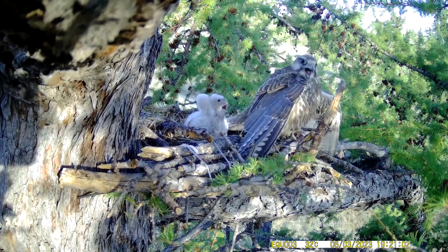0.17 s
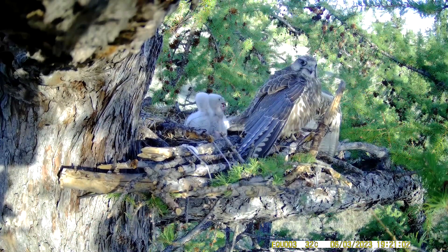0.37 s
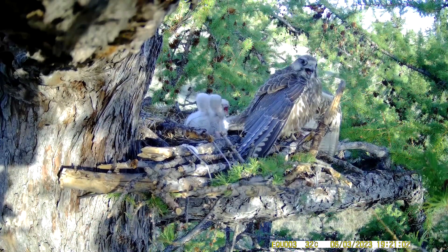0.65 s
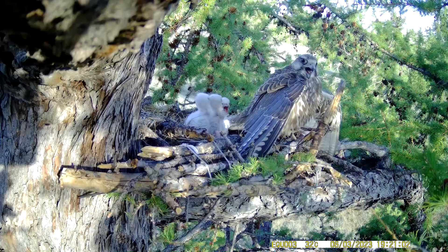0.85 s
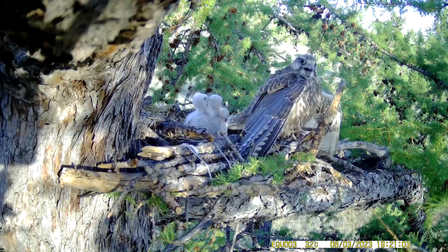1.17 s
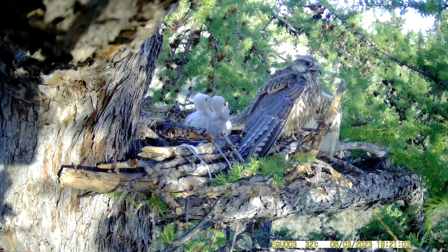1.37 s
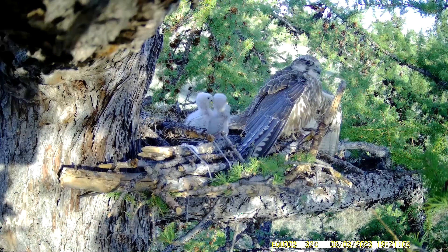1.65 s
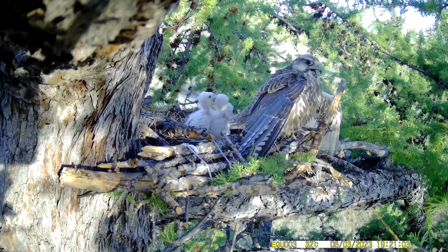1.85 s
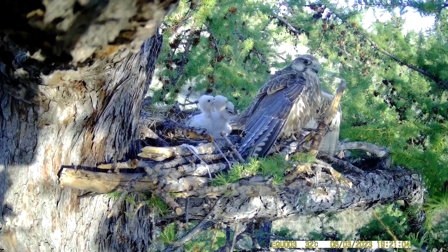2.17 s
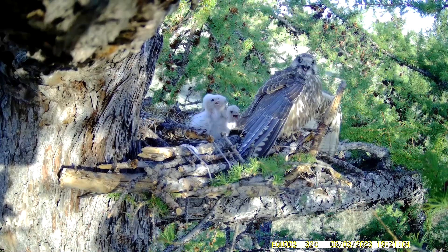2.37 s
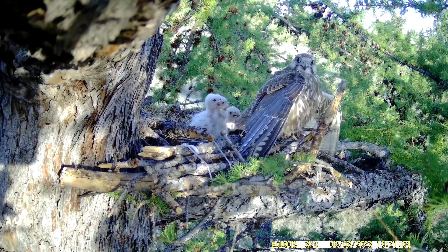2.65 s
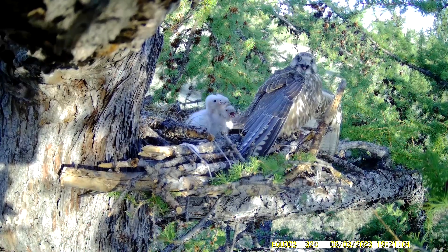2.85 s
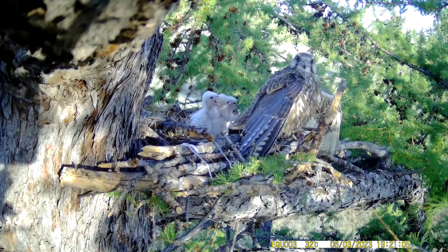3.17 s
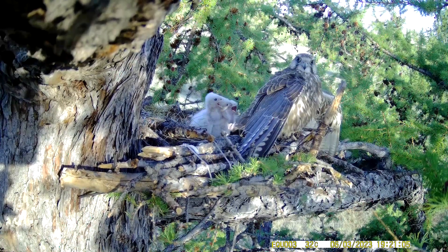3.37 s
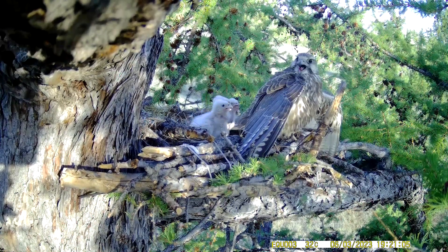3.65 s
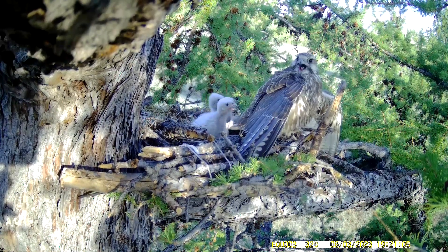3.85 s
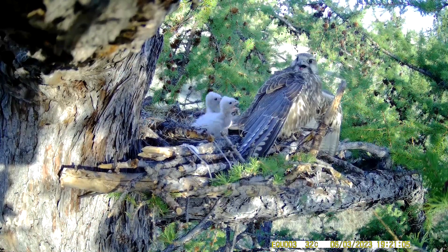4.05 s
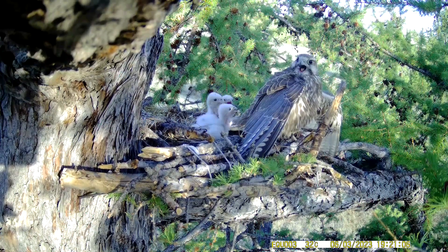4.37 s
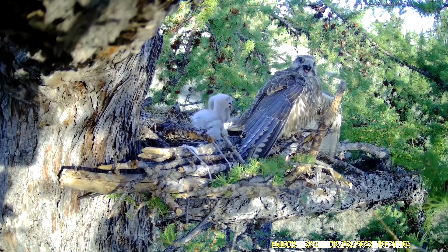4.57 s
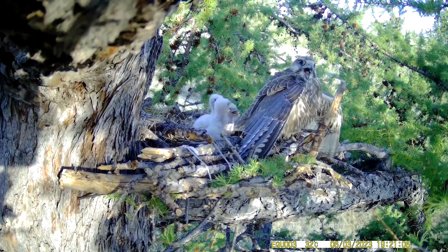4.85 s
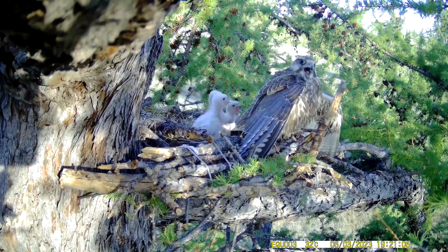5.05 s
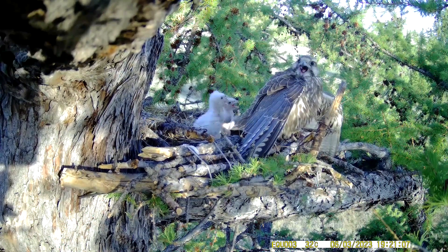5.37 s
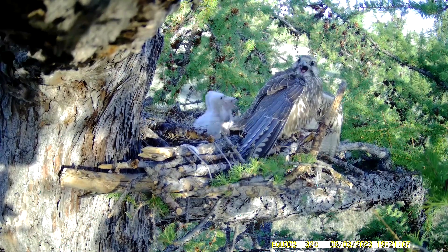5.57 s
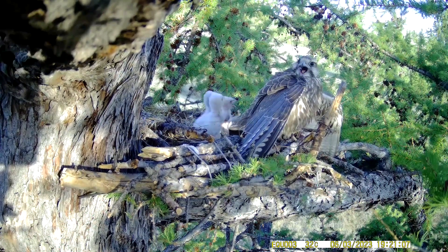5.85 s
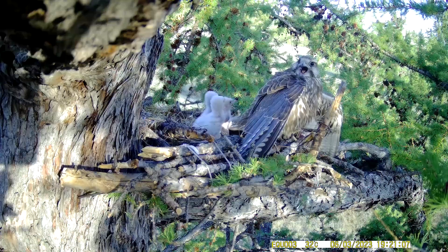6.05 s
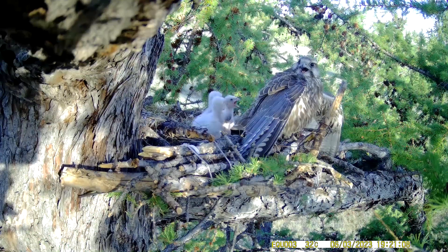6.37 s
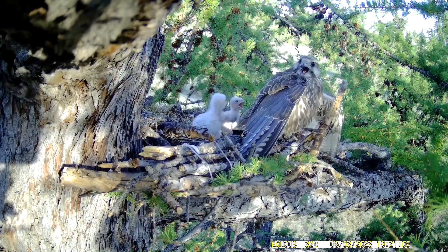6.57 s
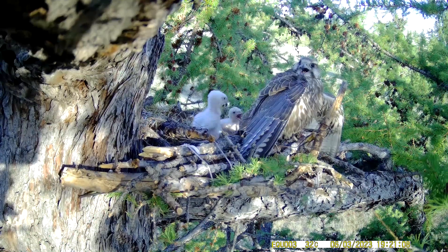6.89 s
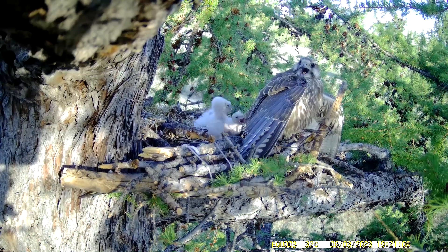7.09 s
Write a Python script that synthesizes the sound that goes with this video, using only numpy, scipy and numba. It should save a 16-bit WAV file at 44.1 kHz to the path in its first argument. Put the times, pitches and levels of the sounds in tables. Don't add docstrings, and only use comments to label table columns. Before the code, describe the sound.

A falcon calls close to a small outdoor microphone at a tree nest. Thirteen harsh screams begin at about 0, 0.5, 1.15, 1.75, 2.2, 2.7, 3.4, 4.2, 4.8, 5.2, 5.8, 6.4 and 6.9 seconds, the last running almost to the end. Each starts with a quick creaky click, rings bright and piercing around 1.1 to 1.25 kHz with strong overtones, climbs slightly, roughens and falls sharply. The longest, from 3.4 to 4.1, falters near its end; later ones often crack high before settling. In the gaps chicks give faint hoarse rasps and thin peeps, notably around 1, 1.5, 2.1, 3.3, 4.1, 4.65 and 5.7 seconds. Soft leaf hiss continues beneath. Two dull wind bumps come near 0.1 and 0.4; stronger low thumps cluster from 6.5 to 7.1. A very short echo scatters off trunk and branches.

```python
import sys
import numpy as np
from scipy import signal
from scipy.fft import rfft, irfft
from scipy.io import wavfile
from scipy.ndimage import uniform_filter1d
from numba import njit

SR = 44100
rng = np.random.default_rng(int(sys.argv[2]) if len(sys.argv) > 2 else 0)


def invert_db(level):
    return 10 ** (np.asarray(level, dtype=float) / 20)


def materialize(psi):
    bounded = np.clip(np.atleast_2d(psi).T, -1, 1)
    quanta = np.round(bounded * 32767).astype(np.int16)
    wavfile.write(sys.argv[1], SR, quanta)


N = 318400
T = np.arange(N) / SR


def shape_db(hz, points):
    f, db = np.transpose(points)
    return np.interp(np.log(np.maximum(hz, 1)), np.log(f), db)


def colour(x, points):
    hz = np.arange(len(x) // 2 + 1) * SR / len(x)
    return irfft(rfft(x) * invert_db(shape_db(hz, points)), len(x))


def unit(x):
    return x / np.sqrt(np.mean(x ** 2))


def walk(rate):
    hold = max(int(SR / rate), 1)
    steps = np.repeat(rng.standard_normal(N // hold + 1), hold)
    slewed = uniform_filter1d(uniform_filter1d(steps, hold), hold)
    return unit(slewed[:N])


def bumps(events, power):
    return sum(height * np.sin(np.pi * np.clip((T - at) / length, 0, 1)) ** power
               for at, length, height in events)


@njit
def svf(x, hz, width):
    y, band, low = np.empty(len(x)), 0., 0.
    for i in range(len(x)):
        g, k = np.tan(np.pi * hz[i] / SR), width / hz[i]
        v = (band + g * (x[i] - low)) / (1 + g * (g + k))
        band, low, y[i] = 2 * v - band, low + 2 * g * v, k * v
    return y


def wind():
    # time_s, level_db
    puffs = [(0.0, -45.5), (0.18, -54), (0.42, -48.5), (4.93, -54), (5.03, -47.5), (5.81, -52), (6.15, -48),
             (6.35, -60), (6.54, -40.5), (6.67, -51.5), (6.71, -43.5), (6.78, -54), (6.98, -39),
             (7.02, -54), (7.1, -40.5), (7.22, -57)]
    # pitch_hz, density_db
    buffet = [(12, -12), (20, 5), (47, -2.5), (166, -20), (300, -32), (390, -30), (660, -120)]
    # start_s, peak_db, pitch_hz
    thumps = [
        (0.066, -35.5, 51),
        (0.429, -35, 52.4),
        (6.513, -32, 67.3),
        (6.569, -36, 50.8),
        (6.705, -28, 80.6),
        (6.837, -36, 51.3),
        (6.925, -31, 64.5),
        (6.967, -29.5, 90.4),
        (7.094, -33, 65.2),
    ]
    eddies = unit(colour(rng.standard_normal(N) * invert_db(3.5 * walk(25)), buffet))
    out = eddies * invert_db(np.interp(T, *np.transpose(puffs)))
    for start, db, hz in thumps:
        t = T - start - .014
        out += invert_db(db) * np.exp(-(t / 0.0057) ** 2) * np.sin(2 * np.pi * hz * t + 0.41)
    return out


def leaves():
    # pitch_hz, density_db
    foliage = [(120, -30.5), (200, -2.5), (940, 2), (1150, -1.5), (1980, 3), (2290, -21), (3610, -25),
               (4500, -11), (15500, -12)]
    level_db = -62.5
    return invert_db(level_db + walk(2.8)) * unit(colour(rng.standard_normal(N), foliage))


def ring(s, hz, t60, db):
    t = np.clip(T - s, 0, 3 * t60)
    decay = invert_db(db - 60 * t / t60)
    onset = 1 - np.exp(-t / 0.00071)
    return decay * onset * np.sin(2 * np.pi * hz * t) * (T - s < 3 * t60)


def creaks():
    # start_s, first_gap_s, first_db, second_db
    creak_rows = [(.0062, 0.0031, -23, -19.5), (0.485, 0.0056, -34, -18.5), (1.143, 0.0057, -33, -26),
                  (1.7507, .004, -18.5, -20.5), (2.2072, 0.0055, -31, -21), (2.711, 0.0038, -18, -18),
                  (3.4365, .0045, -21, -28), (4.1905, .0065, -21.5, -28), (4.7647, 0.0052, -22, -30.5),
                  (5.2251, 0.0065, -22, -26), (5.8163, .0062, -25, -34), (6.3872, 0.0053, -21.5, -41),
                  (6.9236, 0.0053, -21, -22)]
    windpipe_hz, t60_s = 2160, 0.0061
    speedup, last_db = .85, -3
    out, chance = np.zeros(N), rng.standard_normal((len(creak_rows), 3))
    for (first, gap, first_db, second_db), detunes in zip(creak_rows, chance):
        third = first + gap * (1 + speedup)
        snaps = ((first, first_db), (first + gap, second_db), (third, second_db + last_db))
        for (s, db), detune in zip(snaps, detunes):
            for lag, lag_db in ((0, 6.9), (.0012, 1.5)):
                out += ring(s + lag, windpipe_hz * (1 + .04 * detune), t60_s, db + lag_db)
            out += ring(s, windpipe_hz / 2.23, t60_s, db - 8.0)
    return out


def effort():
    # start_s, end_s, settled_pitch_hz, top_pitch_hz, climb_share (0-1 of the scream)
    screams = [(.024, .326, 1145, 1205, 0.76), (.502, .946, 1113, 1241, .89),
               (1.159, 1.487, 1164, 1213, .8), (1.763, 2.045, 1074, 1136, 1),
               (2.223, 2.557, 1087, 1172, 0.82), (2.725, 3.075, 1097, 1201, 0.81),
               (3.445, 4.065, 1074, 1243, 0.96), (4.201, 4.639, 1154, 1256, 0.97),
               (4.776, 5.12, 1172, 1238, 0.8), (5.241, 5.697, 1158, 1255, 0.61),
               (5.827, 6.269, 1183, 1251, 0.65), (6.398, 6.796, 1169, 1252, 0.62),
               (6.937, 7.4, 1163, 1258, .65)]
    # peak_db, swell_db, second_over_first_db, hoarseness_db, final_drop_s (time constant)
    voices = [(-25.5, 4.5, 4.5, -1, .011), (-24.5, 7.5, 6, 0, .013), (-27, 8, 5, 0.5, .015),
              (-31.5, 6.5, 8.5, 2, .012), (-26.5, 10, 9, 2.5, .015), (-25, 10, 7, -0.5, .023),
              (-24.5, 11, 5.5, 2.5, .012), (-24.5, 8, 2.5, 1, .011), (-26, 5.5, 1.5, -1.5, 0.0093),
              (-24, 5.5, 2.5, 1.5, .009), (-24, 7, 2, -0.5, 0.01), (-24, 7, 1, -0.5, 0.011),
              (-24.5, 6, 2, -0.5, .01)]
    # start_s, length_s, shift_hz
    slips = [(0.015, 0.0592, 12), (0.076, 0.13, -12), (4.77, 0.0276, -25), (1.24, 0.082, -8),
             (2.1, 0.099, 4.5), (6.64, 0.0985, -6), (5.8, .2, -10), (3.5, 0.57, 25.5), (4.54, 0.085, 24),
             (5.46, 0.068, 8), (5.55, .04, -20), (6.13, 0.095, 19.5)]
    # flip_s, offset_hz
    kicks = [
        (1.36, -45),
        (4.251, 110),
        (4.82, 90),
        (5.3, 39.5),
        (5.862, 95),
        (6.436, 114.5),
        (6.99, 22),
    ]
    # start_s, length_s, dip_hz
    stumbles = [
        (3.755, 0.043, 12.8),
        (3.812, 0.028, 19),
        (3.89, 0.051, 16),
        (3.955, 0.027, 22),
        (4.385, 0.029, 10),
        (5.6, .02, 14.7),
        (5.645, 0.022, 12.7),
    ]
    # start_s, length_s, rise_db
    rasp_spells = [(.01, 0.018, 6), (.12, 0.13, 6), (.63, .2, 3), (1.145, .03, 5), (1.26, 0.14, 0),
                   (1.75, 0.035, 6), (2.712, 0.032, 14.5), (2.86, 0.16, 6), (3.56, 0.21, 4), (4.3, 0.11, 4),
                   (6.922, .025, 3)]
    # start_s, length_s, rise_db
    doublings = [(.02, 0.02, 24), (.05, .04, 18), (.26, 0.064, 6), (.56, 0.088, 18), (.84, 0.073, 4.5),
                 (1.155, 0.036, 19), (1.2, 0.033, 11), (1.42, .06, 8), (1.86, .05, 25), (1.93, 0.047, 30),
                 (1.995, 0.042, 29), (2.3, 0.092, 24), (2.712, .03, 29.5), (2.42, 0.067, 12.5),
                 (2.76, .1, 24), (4.36, .14, 6), (5.39, 0.11, 1), (6.02, 0.097, 4)]

    rows = np.hstack([screams, voices])
    which = np.searchsorted((rows[1:, 0] + rows[:-1, 1]) / 2, T)
    start, end, low_hz, top_hz, climb, peak_db, swell_db, lift_db, hoarse_db, drop_s = rows[which].T
    since, left = np.maximum(T - start, -.01), np.maximum(end - T, -.006)
    u = np.clip(since / (end - start), 0, 1)
    opening = np.clip((T - start + 0.012) / 0.018, 0, 1)
    closing = np.clip((end + 0.0073 - T) / 0.0082, 0, 1)
    gate = opening * closing

    pushed = low_hz + (top_hz - low_hz) * np.minimum(u / climb, 1) + bumps(slips, 1)
    kick_fall_s = .004
    kick = sum(hz * (which == which[int(s * SR)]) * (1 + np.tanh((s - T) / kick_fall_s / 2)) / 2
               for s, hz in kicks)
    sag = np.exp(-left / drop_s)
    stumble = bumps(stumbles, 0.515)
    scoop_hz = 59.1 * np.exp(-since / .018)
    hz = pushed - stumble + kick - scoop_hz - 231.6 * sag

    shut_db = 16 * np.clip(1 - left / 0.0069, 0, 1)
    swelling_db = swell_db * (1 - np.minimum(u / 0.75, 1)) ** 1.46
    air_db = peak_db - swelling_db - 3 * np.exp(-since / 0.015) - shut_db
    sag_db = 21.5 * sag
    dull_db = 3 * kick / 100
    first_db = air_db - sag_db
    second_db = air_db + lift_db - 0.245 * sag_db - dull_db - 0.18 * stumble
    fourth_db = air_db - 5.5 + 0.21 * lift_db - dull_db + u - 1.48 * sag_db

    strain_hz, slack_db_per_hz, slack_max_db = 1228, 0.13, 13.5
    slack_db = np.clip(slack_db_per_hz * (strain_hz - pushed), 0, slack_max_db) - hoarse_db
    rasp_start_db = 9 * np.exp(-since / .015)
    rasp_end_db = np.maximum(7 - lift_db, 0) * np.minimum(2 * sag, 1)
    rasp_db = -39 - slack_db - shut_db + rasp_start_db + rasp_end_db + bumps(rasp_spells, 0.61)
    half_end_db = 7.5 * np.exp(-left / 0.045)
    half_db = -43.5 - 2.03 * slack_db - shut_db + half_end_db + bumps(doublings, 0.29)
    return gate, hz, first_db, second_db, fourth_db, half_db, rasp_db


def falcon():
    # pitch_hz, level_db
    upper = [(3000, 2), (4800, 0.5), (6000, -16), (7400, -15), (8700, -16), (10000, -23), (11500, -25),
             (13000, -39.5), (15500, -41)]
    # pitch_hz, level_db
    halves = [(600, -28), (1800, -15), (3000, -4.5), (4300, -13), (5500, -21.5), (8000, -20),
              (12000, -42.5)]
    # pitch_hz, level_db
    throat = [(250, -44), (700, -35), (1400, -14), (2000, -12.5), (2900, 5), (4200, -9.5), (5600, -12),
              (8000, -13), (15500, -29)]
    # start_s, length_s, rise_db
    flares = [
        (4.55, .06, 15),
        (6.15, .08, 11),
        (5.5, .15, 6),
    ]
    notch_hz, notch_width_hz, notch_depth_db = 3570, 85, -12
    windpipe_ratio, windpipe_width_hz = 2.2, 80.0

    gate, hz, first_db, second_db, fourth_db, half_db, rasp_db = effort()
    strain = np.minimum(invert_db(rasp_db - second_db + 20), 2)
    hz = hz * (1 + .001 * walk(45) + .0022 * strain * walk(110))
    phase = 2 * np.pi * np.cumsum(hz) / SR + 0.018 * strain * walk(900)
    lift_db = np.clip(uniform_filter1d(second_db - first_db, 6000), -2, 12) - 0.5
    flicker = np.clip(1 + .45 * walk(70), 0, 3)
    voice = invert_db(first_db) * np.sin(phase)
    voice += invert_db(second_db + 0.27 * strain * walk(180)) * np.sin(2 * phase + 0.29)
    for k in range(3, 15):
        tilt_db = lift_db * (-.15 * min(k - 4, 3) + 0.069 * max(k - 8, 0))
        notch_db = notch_depth_db * flicker * np.exp(-((k * hz - notch_hz) / notch_width_hz) ** 2)
        waver_db = (.3 + .2 * k) * walk(35)
        db = fourth_db + shape_db(k * hz, upper) + notch_db + tilt_db + waver_db
        voice += invert_db(db) * np.sin(k * phase + 0.24 * k) * (k * hz < 16000)

    doubling = invert_db(half_db + 3 + 3.5 * walk(25))
    slip = .4 * walk(60)
    rasp_db = np.minimum(rasp_db, fourth_db + 10)
    smear = invert_db(rasp_db - 4.5) * walk(200)
    for k in np.arange(.5, 12):
        line = invert_db(shape_db(k * hz, halves) + 2.5 * walk(50)) * np.sin(k * phase + slip + 1.94 * k)
        voice += (doubling + smear) * line

    breath = unit(colour(rng.standard_normal(N), throat)) * (1 + 1.11 * np.cos(phase))
    pipe = unit(svf(rng.standard_normal(N), windpipe_ratio * hz, windpipe_width_hz))
    flare_db = bumps(flares, .5)
    rasp = invert_db(rasp_db + 2.5 * walk(45)) * (invert_db(-9) * breath + invert_db(flare_db - 6) * pipe)
    return gate * (np.sqrt(2) * voice + rasp)


def chicks():
    # start_s, end_s, first_db, last_db, voice_hz
    begs = [(.3, 0.362, -51, -57, 1450), (1.08, 1.126, -82, -80, 1400), (1.46, 1.684, -54.5, -53.5, 1440),
            (1.734, 2.118, -58, -50, 1300), (2.518, 2.718, -59, -46.5, 1380),
            (3.085, 3.376, -72, -48, 1340), (4.0, 4.119, -53, -47, 1310), (4.601, 4.667, -40, -52.5, 1390),
            (4.712, 5.131, -67, -50.5, 1400), (5.66, 5.729, -63, -58, 1240),
            (6.219, 6.395, -55.5, -62, 1430), (6.758, 6.92, -60, -70, 1530)]
    # pitch_hz, width_hz, level_db
    throat_bands = [
        (2160, 520, -4.5),
        (3060, 560, -3),
        (4400, 1170, -2),
        (8100, 2100, -22.5),
    ]
    # start_s, # length_s, start_hz, end_hz, level_db
    peeps = [(.955, .145, 2440, 2460, -56), (1.039, .095, 1270, 1470, -54.5), (.383, .1, 1650, 1660, -60),
             (.346, .047, 1450, 1070, -55), (1.55, .09, 1500, 1420, -52), (1.638, .05, 1393, 997, -53),
             (2.105, .024, 1256, 1100, -49), (2.14, .076, 1450, 1450, -61), (3.357, .0317, 1277, 1062, -48),
             (3.39, .04, 1470, 1450, -64), (4.11, .075, 2450, 2480, -62), (6.804, .096, 1498, 1546, -64),
             (.948, .028, 2300, 2250, -50), (5.705, .03, 2250, 2350, -54)]
    fade_s, nestle_db = 0.031, -60
    begging = invert_db(nestle_db)
    for start, end, db0, db1, _ in begs:
        fade = np.interp(T, (start - fade_s, start, end, end + fade_s), (0, 1, 1, 0))
        begging = begging + invert_db(np.interp(T, (start, end), (db0, db1))) * fade
    noise = rng.standard_normal(N) * invert_db(0.43 * walk(120))
    middles = [(row[0] + row[1]) / 2 for row in begs]
    voice_hz = np.interp(T, middles, [row[4] for row in begs])
    rasp = unit(svf(svf(noise, voice_hz, 350.0), voice_hz, 480.0))
    for hz, width, band_db in throat_bands:
        centre = hz * (1 + 0.07 * walk(7))
        band = unit(svf(svf(noise, centre, 1. * width), centre, 0.67 * width))
        rasp += invert_db(band_db + 2 * walk(14)) * band
    out = unit(rasp) * begging

    waver = 1 + 0.00765 * walk(90)
    for start, length, hz0, hz1, peep_db in peeps:
        over_db = -2 if abs(np.log(hz1 / hz0)) > 1 / 10 else -20
        u = np.clip((T - start) / length, 0, 1)
        bend = u ** (.4 if hz1 > hz0 else 2.2)
        phase = 2 * np.pi * np.cumsum((hz0 + (hz1 - hz0) * bend) * waver) / SR
        overtones = np.sin(2 * phase) + 0.25 * np.sin(3 * phase) + 0.12 * np.sin(4 * phase)
        out += invert_db(peep_db) * np.sin(np.pi * u) ** 0.46 * (np.sin(phase) + invert_db(over_db) * overtones)
    return out


def tree_echo(bird):
    t60_s, level_db = .09, -27
    t = T[:SR // 4]
    scatter = rng.standard_normal(len(t)) * invert_db(-60 * t / t60_s)
    return invert_db(level_db) * signal.fftconvolve(bird, scatter / np.sqrt(np.sum(scatter ** 2)))[:N]


def scene():
    bird = falcon() + creaks()
    return (bird + tree_echo(bird) + chicks() + wind() + leaves())[None]


def band_limit(x):
    return signal.sosfilt(signal.butter(12, 15740, fs=SR, output="sos"), x)


def record(dry):
    top_hz = 15600
    low_pass = signal.ellip(8, .2, 60, top_hz, fs=SR, output="sos")
    mix = signal.sosfilt(low_pass, dry)
    return band_limit(mix)


dry = scene()
out = record(dry)
materialize(out)
```